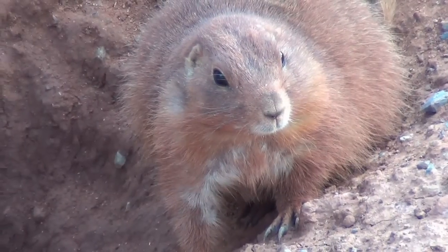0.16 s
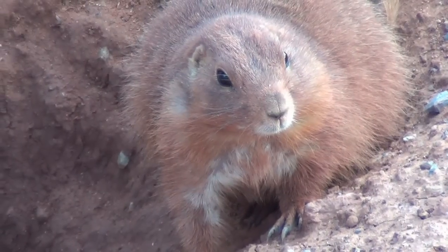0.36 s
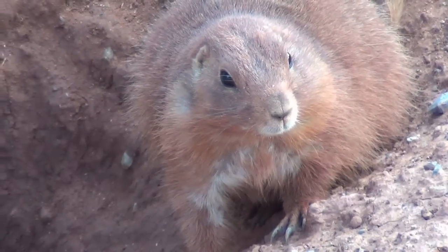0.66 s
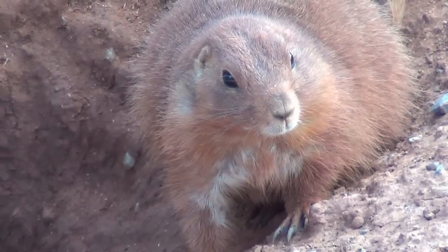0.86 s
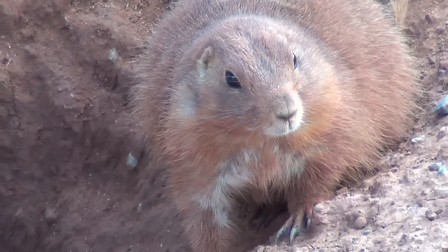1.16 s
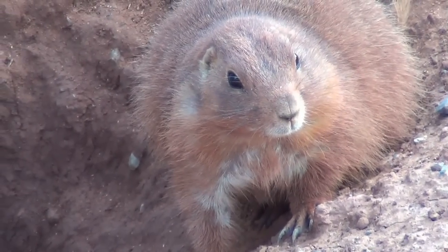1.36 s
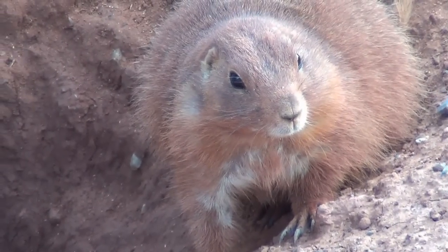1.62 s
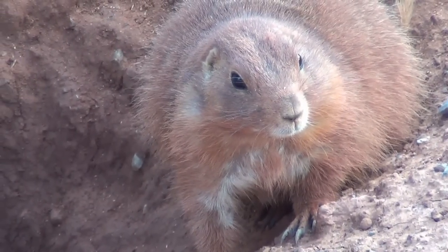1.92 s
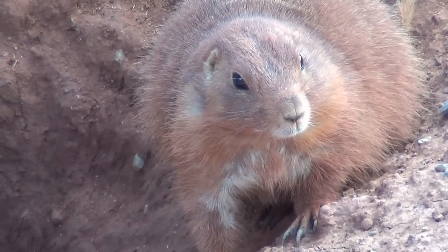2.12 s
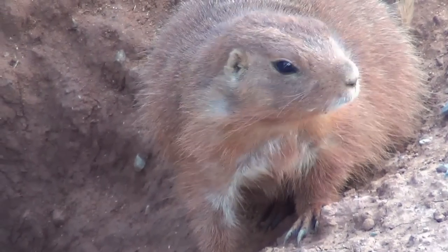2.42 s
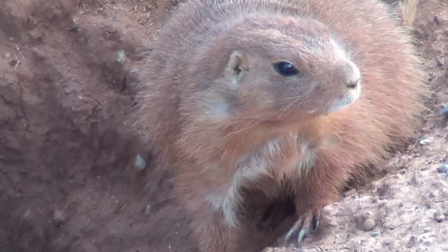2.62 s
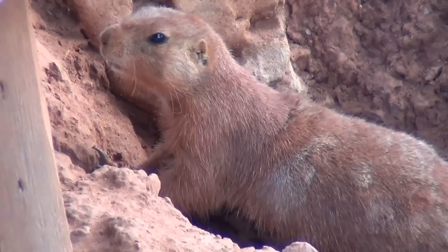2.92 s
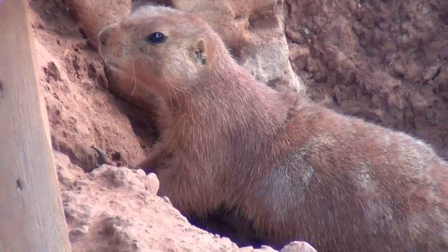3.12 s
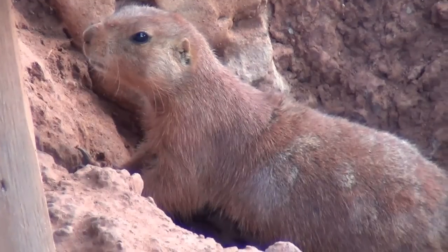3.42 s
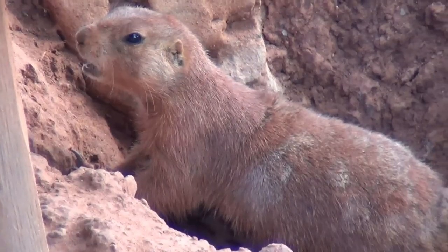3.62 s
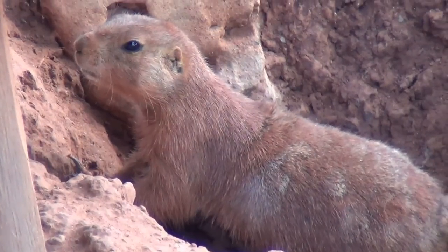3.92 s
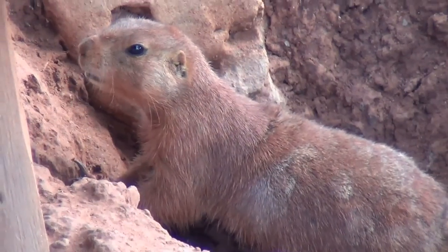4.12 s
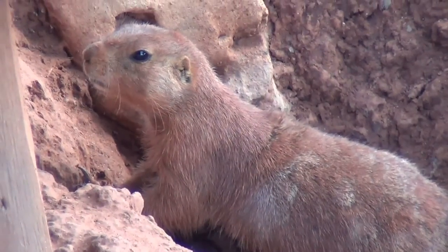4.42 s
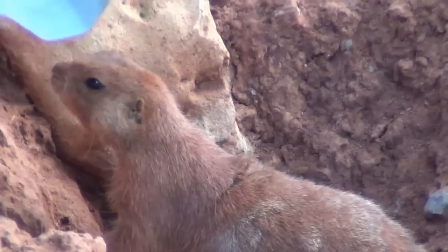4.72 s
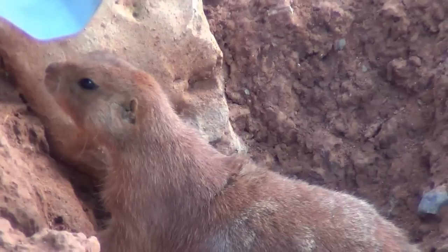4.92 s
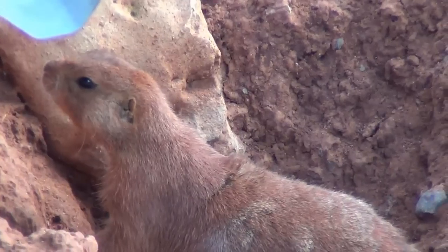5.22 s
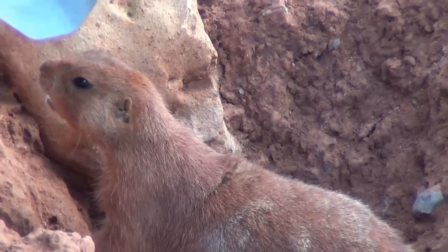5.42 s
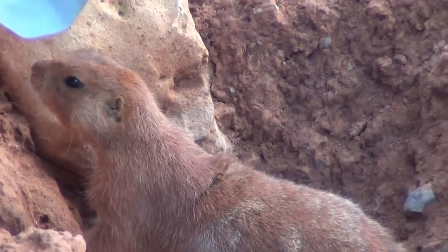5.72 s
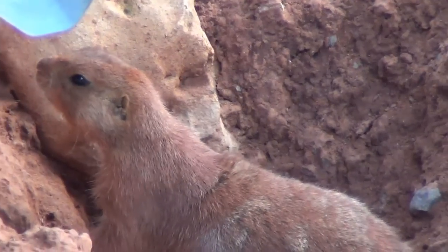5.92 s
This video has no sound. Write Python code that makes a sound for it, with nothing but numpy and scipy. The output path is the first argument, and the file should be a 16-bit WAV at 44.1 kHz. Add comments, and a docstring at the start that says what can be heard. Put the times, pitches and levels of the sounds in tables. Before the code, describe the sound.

An earthen enclosure outdoors, heard in stereo: steady low rumble, soft hiss and distant whistled bird chirps for nearly three seconds. Then a close prairie dog barks at a regular pace, each yip a brief, piercing arch up and back with a short scattered echo and thin ringing tail. Early yips are harsher, later ones cleaner; a dry double rasp comes between two of them.

```python
"""Prairie dog barking in an earthen enclosure

A prairie dog barks close by: short, shrill yips, each one a set of harmonics whose pitch arches up and back.
The yips echo off banks and ring between walls; the first is heard only as its ring, cutting in abruptly.
Farther off, bird chirps and one faint far-off yip are whistled glides; a double rasp of noise falls between
two barks. Shaped noise gives a steady outdoor rumble and a faint hiss; a limiter ducks the loud peaks."""
import sys
import numpy as np
from scipy import signal
from scipy.fft import rfft, irfft
from scipy.io import wavfile

SR = 44100
rng = np.random.default_rng(int(sys.argv[2]) if len(sys.argv) > 2 else 0)


def generate_wav(signal):
    """Clip the signal to [-1, 1] and save it as 16-bit WAV at the path in sys.argv[1]."""
    frames = np.transpose(np.atleast_2d(signal))
    scaled = np.clip(frames, -1, 1) * 32767
    pcm = np.round(scaled).astype(np.int16)
    wavfile.write(sys.argv[1], SR, pcm)


N = 267246
TIME = np.arange(N) / SR   # seconds
FREQS = np.maximum(np.arange(N // 2 + 1) * SR / N, 1)   # Hz, kept above zero for the log axis
WALLS_T60_S = 0.65   # time for the ring between the walls to fall by 60 dB
ECHO_WIDTH = 0.19   # left-right spread of the scattered echoes, 0-1


def from_db(db):
    """Decibels to gain."""
    return 10 ** (np.asarray(db) / 20)


def rms_one(x):
    """Scale to unit power."""
    return x / np.sqrt(np.mean(x ** 2) + 1e-20)


def between(start, end, share):
    """The value a share of the way from start to end."""
    return start + (end - start) * np.clip(share, 0, 1)


def at_hz(points, hz):
    """Read a table on a log-frequency axis."""
    where, value = np.transpose(points)
    return np.interp(np.log(hz), np.log(where), value)


def filtered(x, spectrum):
    """Pass a sound through a response given as (Hz, dB) points."""
    return irfft(rfft(x) * from_db(at_hz(spectrum, FREQS)), N)


def coloured(spectrum):
    """Noise with the given spectrum, rms 1."""
    return rms_one(filtered(rng.standard_normal(N), spectrum))


def flutter(rate_hz):
    """Random wavering up to about the given rate, spread 1."""
    lowpass = signal.butter(2, rate_hz, fs=SR, output="sos")
    return rms_one(signal.sosfilt(lowpass, rng.standard_normal(N)))


def swell(t, length, attack, release):
    """Smooth opening and closing of one sound, each a quarter of a sine wave."""
    opening = np.sin(np.pi / 2 * np.clip(t / attack, 0, 1))
    closing = np.sin(np.pi / 2 * np.clip((length - t) / release, 0, 1))
    return opening * closing


def pan(x, lean_db):
    """Place a sound between left and right; lean_db is left minus right."""
    return x * from_db(np.array([[lean_db], [-lean_db]]) / 2)


def enclosure(x, early_db, early_t60, late_db, late_t60, width):
    """Scatter from rough earth dies quickly; a ring between the walls lasts longer."""
    t = TIME[:SR]
    scatter = from_db(early_db - 60 * t / early_t60) / np.sqrt(early_t60)
    wall_ring = from_db(late_db - 60 * t / late_t60) / np.sqrt(late_t60)
    build_up = np.clip(t / 0.0019, 0, 1)
    unit_energy = np.sqrt(2 * np.log(1000) / SR)   # makes the dB settings echo energy, whatever the T60
    paths = rng.standard_normal((2, SR)) * (scatter + wall_ring) * build_up * unit_energy
    mid, side = signal.fftconvolve(x[None], paths, axes=1)[:, :N]
    return np.array([mid + width * side, mid - width * side])


# How alike left and right are in the steady noise. Each row: frequency in Hz, likeness from 0 to 1.
LEFT_RIGHT_LIKENESS = [(60, 0.87), (150, 0.95), (380, 0.93), (940, 0.92), (2360, 0.96), (5920, 0.55),
                       (14800, 0.8)]
# Which side the steady noise leans to. Each row: frequency in Hz, left minus right in dB.
LEFT_RIGHT_LEAN = [(50, 4), (150, 2), (350, 4), (750, 4), (2400, 1.0), (6000, -2), (14000, -1.5)]


def steady(spectrum, level_db):
    """Even noise from all around, shared in part by the two close microphones."""
    alike = np.clip(at_hz(LEFT_RIGHT_LIKENESS, FREQS), 0, 0.999)
    mid, side = rfft(coloured(spectrum)), rfft(coloured(spectrum))
    sign = np.array([[1], [-1]])   # left, right
    both = np.sqrt(1 + alike) * mid + sign * np.sqrt(1 - alike) * side
    both *= from_db(sign * at_hz(LEFT_RIGHT_LEAN, FREQS) / 2)
    return from_db(level_db) * rms_one(irfft(both, N))


# Colour of the distant rumble. Each row: frequency in Hz, relative level per Hz in dB.
RUMBLE_COLOUR = [(15, -62), (25, -34), (34, -60), (44, -9), (91, -6), (131, -1), (200, -2), (273, -5.5),
                 (441, -9), (525, -10.5), (674, -8.5), (1430, -19), (2500, -23), (3250, -32.5),
                 (5500, -120)]


def outdoor_rumble():
    """Low, distant noise whose level wavers very slightly."""
    return steady(RUMBLE_COLOUR, level_db=-42.5) * from_db(0.5 * flutter(8.3))


# Colour of the faint hiss. Each row: frequency in Hz, relative level per Hz in dB.
HISS_COLOUR = [(1800, 2), (2300, -2), (2900, 4.5), (3800, 1), (5200, -2.5), (6400, 1.5), (7700, 5),
               (8800, 3.5), (10000, -3), (12000, -6.5), (14500, -8)]


def hiss():
    """Unvarying high noise."""
    return steady(HISS_COLOUR, level_db=-47.5)


# One bird call of three notes, down, up, down. Each row: start within the call in seconds,
# length in seconds, first, middle and last pitch in Hz, level in dB before echo and quiver.
CALL_NOTES = [(0, .054, 3533, 3444, 1810, -40), (0.062, .027, 3395, 3660, 3700, -43),
              (0.095, .022, 3630, 3070, 2400, -40.5)]
# When the call is sung. Each row: start in seconds, stretch of its timing as a factor.
CALL_TIMES = [(.573, 0.98), (1.008, .94)]
# Lone distant notes: bird chirps and, at 4.749 s, a faint far-off yip, perhaps another prairie dog.
# Each row: start in seconds, length in seconds, middle pitch in Hz,
# glide from first to last pitch in octaves, level in dB before echo and quiver.
LONE_NOTES = [(2.132, .027, 4850, -.25, -55), (2.185, .021, 3640, -0.081, -53),
              (2.612, .024, 4800, -.25, -57), (4.554, 0.00754, 2750, 1, -35),
              (4.749, 0.025, 3770, -0.0018, -43.5)]


def distant_notes():
    """Bird calls and lone notes in one list: start s, length s, first Hz, middle Hz, last Hz, level dB."""
    notes = []
    for call_start, stretch in CALL_TIMES:
        for offset, length, *tone in CALL_NOTES:
            notes.append((call_start + stretch * offset, stretch * length, *tone))
    for start, length, middle_hz, glide, level_db in LONE_NOTES:
        half_glide = 2 ** (glide / 2)
        notes.append((start, length, middle_hz / half_glide, middle_hz, middle_hz * half_glide, level_db))
    return notes


def birds_and_far_yip():
    """Whistled glides from some way off, heard largely as echo; a note weakens as its pitch drops."""
    out, waver, quiver = np.zeros(N), flutter(380), flutter(110)
    for start, length, first_hz, middle_hz, last_hz, level_db in distant_notes():
        now = (TIME >= start) & (TIME < start + length)
        progress = (TIME[now] - start) / length   # 0-1 through the note
        curve = np.polyfit([0, 0.5, 1], [first_hz, middle_hz, last_hz], 2)
        pitch = np.polyval(curve, progress) * (1 + 0.014 * waver[now])
        strength = from_db(level_db + 2.2 * quiver[now]) * pitch / pitch.max()
        whistle = np.sin(2 * np.pi * np.cumsum(pitch) / SR)
        out[now] += strength * swell(progress, 1, attack=0.33, release=0.049) * whistle
    ring = enclosure(out, early_db=-10, early_t60=0.25, late_db=-2, late_t60=WALLS_T60_S, width=ECHO_WIDTH)
    return pan(out + ring, lean_db=4.0)


# The barks. Each row: start in seconds, length in seconds, top pitch in Hz,
# level in dB before the throat filter, harshness from 0 to 1.
BARK_LIST = [ (2.863, 0.044, 1998, -9.5, 0.86), (3.298, 0.045, 1859, -10, 0.83),
             (3.71, .047, 2014, -9.5, .9), (4.117, .046, 2090, -9, 0.9), (4.605, 0.042, 1790, -11, 0.73),
             (5.095, 0.043, 1843, -9.5, .2), (5.49, .043, 1861, -8.5, 0.26), (5.862, .045, 1851, -8, 0.05)]
# Resonances of throat and mouth. Each row: frequency in Hz, gain in dB.
THROAT_RESONANCES = [(1100, -79), (1700, -20.5), (2600, -8), (3300, -4.5), (3700, -4), (4100, -5.5),
                     (4700, -35), (5400, -20.5), (6100, -7.5), (6500, -16.5), (7250, -9.5), (8250, -6.5),
                     (9600, -28.5), (10300, -25), (11000, -44), (12200, -33), (13500, -104)]


def yips(rasp_db=-8, slack_db=7.5):
    """Vocal folds tighten and slacken once per bark; their harmonics sweep the throat resonances."""
    first_hz = 1570   # every bark arches up from here
    easy_hz, tighten_db = 1869, 26   # slope gained per octave of top pitch: tighter folds are brighter
    jitter, shimmer, break_up = 0.035, 0.7, 0.7   # pitch and level roughness; grit reached at the end
    out, wobble, tremble = np.zeros(N), flutter(900), flutter(280)
    highpass = signal.butter(3, 5500, "high", fs=SR, output="sos")
    turbulence = rms_one(signal.sosfilt(highpass, rng.standard_normal(N)))
    for start, length, top_hz, level_db, harsh in BARK_LIST:
        # each setting runs from a gentle bark to a harsh one
        attack_s, crest_s = between(0.016, 0.01, harsh), between(0.031, 0.023, harsh)
        last_hz, rough = between(1563, 1378, harsh), between(0.22, 0.48, harsh)
        bright_db = between(-2.5, 1.9, harsh) + tighten_db * np.log2(top_hz / easy_hz)   # per octave

        now = (TIME >= start) & (TIME < start + length)
        t = TIME[now] - start
        rising = np.clip(1 - t / crest_s, 0, 1)   # 1 at the start, 0 at the crest
        falling = np.clip((t - crest_s) / (length - crest_s), 0, 1)   # 0 at the crest, 1 at the end
        pitch = top_hz - (top_hz - first_hz) * rising ** 2 - (top_hz - last_hz) * falling ** 3
        strain = 1 - rising ** 2
        grit = between(rough * strain, break_up, falling)   # starts clean, roughens, breaks up at the end
        tilt_db = bright_db - slack_db * (rising ** 3 + falling ** 3)   # slack folds: weaker overtones

        phase = 2 * np.pi * np.cumsum(pitch * (1 + jitter * grit * wobble[now])) / SR
        voice = np.zeros(len(t))
        for k, offset in enumerate(rng.uniform(0, 2 * np.pi, size=7), 1):
            overtone_gain = from_db(tilt_db * np.log2(max(k / 2, 1)))   # slope starts at the second harmonic
            voice += overtone_gain * np.sin(k * phase + offset)
        voice *= np.sqrt(2) * (1 + shimmer * grit * tremble[now])
        puffs = 1 + np.cos(phase)   # one puff of air per opening of the folds
        breath = from_db(rasp_db + tilt_db) * strain * turbulence[now] * puffs
        envelope = swell(t, length, attack_s, release=0.0066)
        out[now] += from_db(level_db) * envelope * (voice + 2 * breath)
    return filtered(out, THROAT_RESONANCES)


# Single echoes from nearby ground and banks. Each row: delay in seconds, level in dB, left minus right in dB.
BANK_ECHOES = [(.0011, -22.5, 25), (.0071, -11, 1), (0.0132, -14, -3)]


def prairie_dog():
    """The barks, their single echoes from the banks and the ring of the enclosure."""
    heard_from_s = 2.924   # the barking cuts in abruptly, on the ring of the first yip
    dry = yips()
    near = dry
    for delay, level_db, lean_db in BANK_ECHOES:
        echo = from_db(level_db) * np.interp(TIME - delay, TIME, dry)
        near = near + pan(echo, lean_db)
    ring = enclosure(dry, early_db=-13.5, early_t60=0.22,
                     late_db=-24.5, late_t60=WALLS_T60_S, width=ECHO_WIDTH)
    return pan(near + ring, lean_db=0.2) * (TIME >= heard_from_s)


# The two dry rasps. Each row: start in seconds, length in seconds, level in dB before echo.
RASP_LIST = [(4.36, 0.028, -28), (4.395, 0.029, -34)]
# Colour of the rasps. Each row: frequency in Hz, relative level per Hz in dB.
RASP_SPECTRUM = [(1000, -39), (1500, -12), (1900, 1.5), (2700, 2.5), (3300, -17), (5000, -26), (7000, -14),
                 (12000, -38)]


def rasps():
    """A brief hoarse double rasp between two barks: coloured noise with a rapidly wavering level."""
    shape = np.zeros(N)
    for start, length, level_db in RASP_LIST:
        shape += from_db(level_db) * swell(TIME - start, length, attack=0.0077, release=0.015)
    grain = from_db(4.5 * flutter(250))
    dry = shape * rms_one(coloured(RASP_SPECTRUM) * grain)
    ring = enclosure(dry, early_db=-7.5, early_t60=0.2, late_db=-11, late_t60=WALLS_T60_S, width=ECHO_WIDTH)
    return pan(dry + ring, lean_db=-2.5)


def scene():
    """The animal in front; birds, a far-off yip and outdoor noise behind."""
    return outdoor_rumble() + hiss() + birds_and_far_yip() + prairie_dog() + rasps()


def limiter(x, threshold_db, release_db_per_s, attack_s):
    """Gain drops almost at once on a peak in either channel, then recovers at a steady rate in dB."""
    peak_db = 20 * np.log10(np.abs(x).max(axis=0) + 1e-9)
    over = np.maximum(peak_db - threshold_db, 0)
    recovery = release_db_per_s * TIME
    held = np.maximum.accumulate(over + recovery) - recovery
    pole = np.exp(-1 / (attack_s * SR))
    reduction_db = signal.lfilter([1 - pole], [1, -pole], held)
    return x * from_db(-reduction_db)


def record(dry):
    """The recorder limits the loud peaks and steeply cuts the top of the spectrum."""
    cutoff_hz = 14650
    limited = limiter(dry, threshold_db=-7.5, release_db_per_s=274, attack_s=0.0001)
    top_cut = signal.ellip(12, 0.1, 80, cutoff_hz, fs=SR, output="sos")
    return signal.sosfilt(top_cut, limited)


dry = scene()
out = record(dry)
generate_wav(out)
```